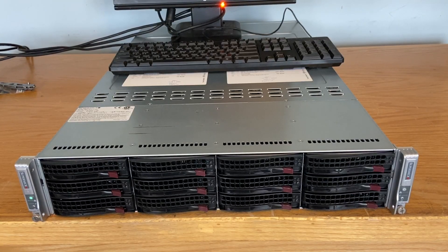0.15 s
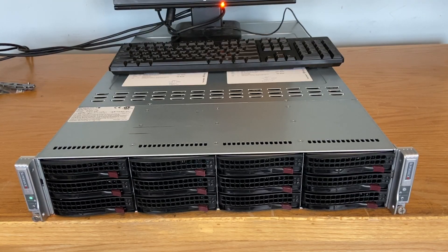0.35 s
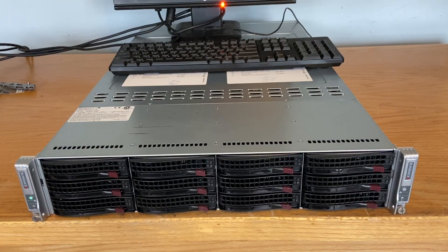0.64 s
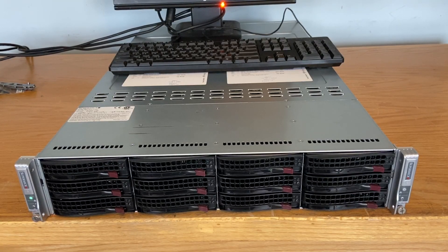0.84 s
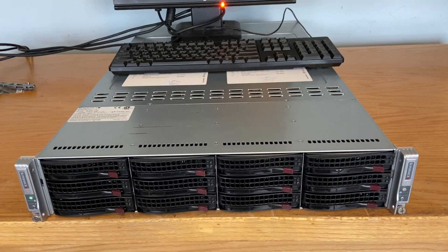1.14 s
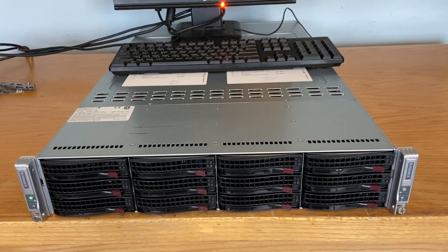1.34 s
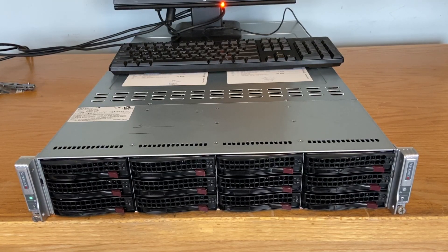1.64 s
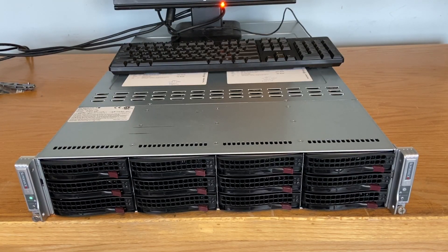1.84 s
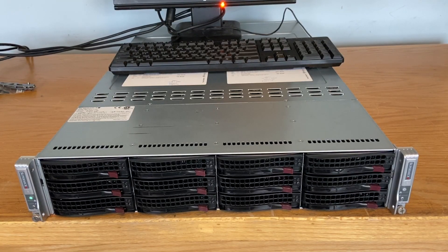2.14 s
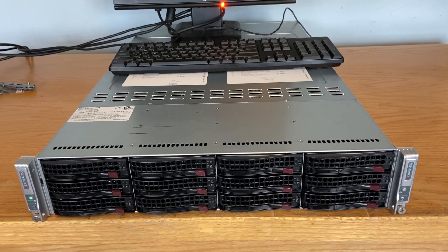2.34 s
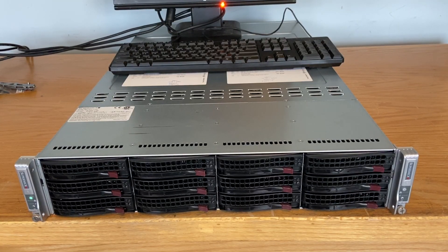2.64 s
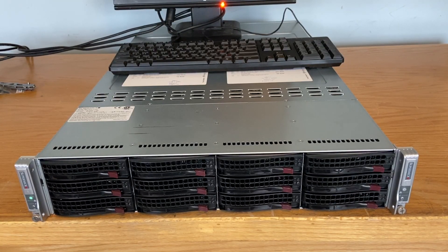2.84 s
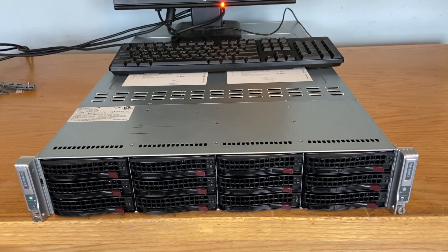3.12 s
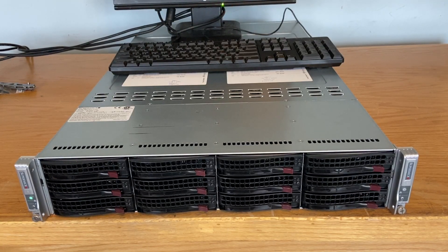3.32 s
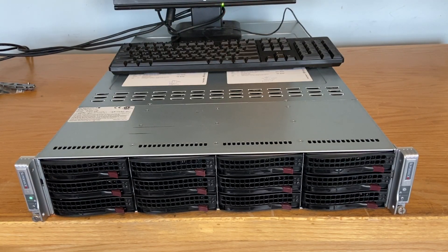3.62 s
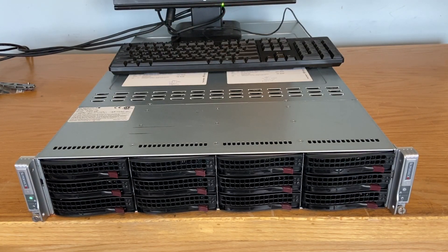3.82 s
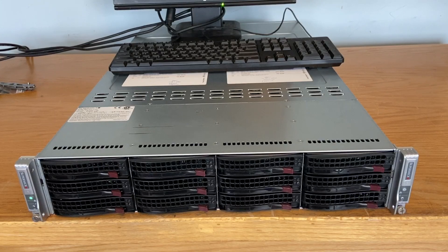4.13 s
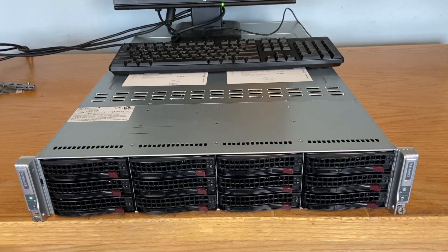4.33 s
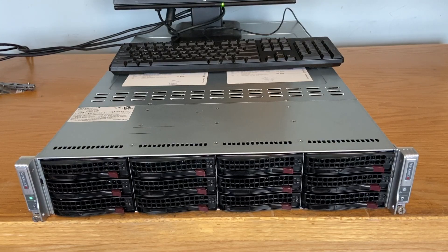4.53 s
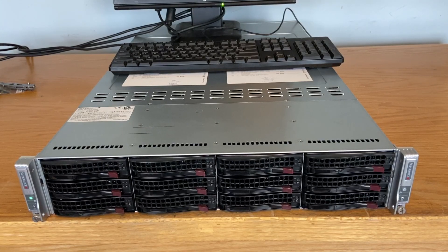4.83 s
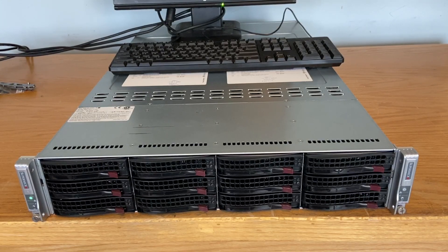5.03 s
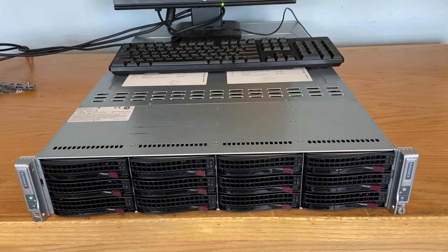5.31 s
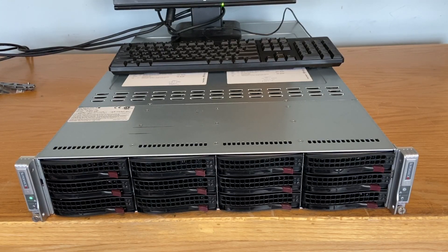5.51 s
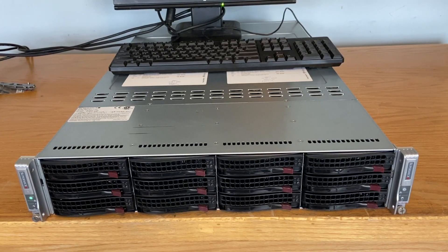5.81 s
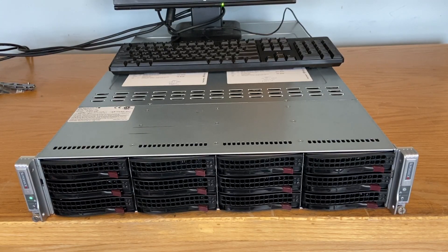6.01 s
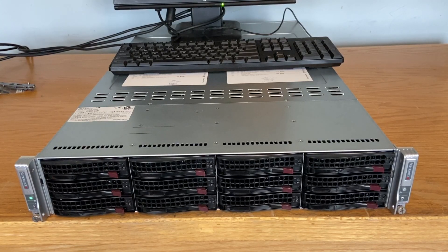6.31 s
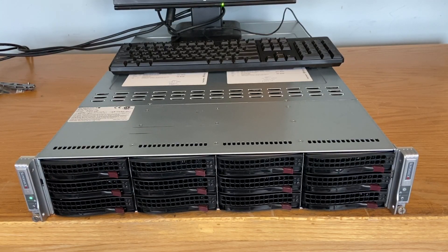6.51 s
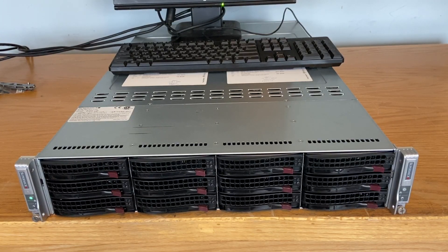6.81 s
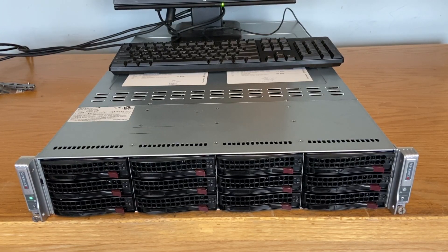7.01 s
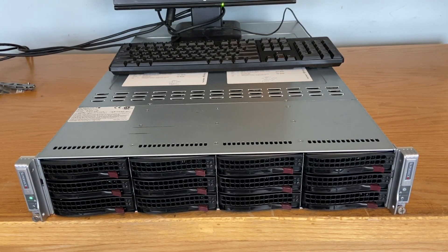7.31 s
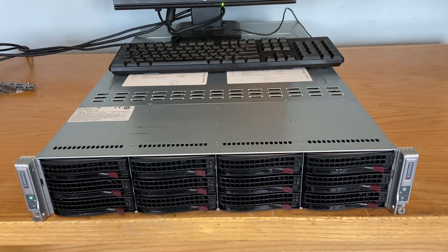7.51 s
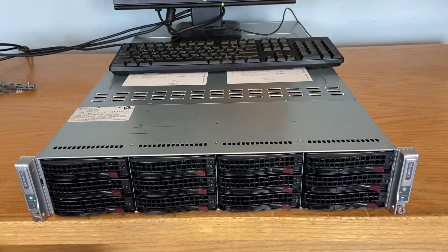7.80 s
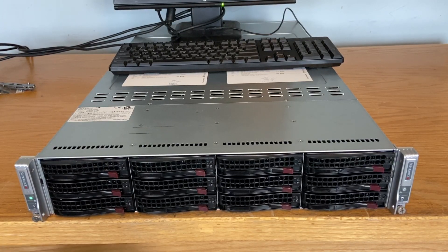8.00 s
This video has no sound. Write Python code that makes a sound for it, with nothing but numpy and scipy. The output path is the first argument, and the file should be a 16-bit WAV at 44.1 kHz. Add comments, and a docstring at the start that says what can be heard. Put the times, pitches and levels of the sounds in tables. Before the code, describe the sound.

Close in front of a metal rack server on a desk in a quiet room, cooling fans already whining climb quickly in pitch and loudness. By about two seconds they reach full speed and hold a steady, slightly beating whine with hollow roaring air and hiss from the drive bays. Two faint low bumps touch the hand-held stereo microphone at the very end.

```python
"""A whine already sounding climbs to a steady pitch: a rack server's cooling fans spin up to full speed.
Two five-bladed rotors at slightly different speeds radiate harmonics of their shafts, whose tones beat.
Filtered noise makes the air that roars in the steel case and hisses through the drive bays in front,
growing as powers of fan speed. Near the end two low, decaying bumps nudge the hand-held microphone."""
import sys
import numpy as np
from scipy.fft import rfft, irfft, next_fast_len
from scipy.io import wavfile
from scipy.ndimage import map_coordinates

SR = 44100
rng = np.random.default_rng(int(sys.argv[2]) if len(sys.argv) > 2 else 0)


def master_out(mix):
    """Clip the mix to full scale and print it as 16-bit PCM to the path in sys.argv[1]."""
    frames = np.transpose(np.atleast_2d(mix))
    ceiling = np.clip(frames, -1, 1)
    pcm = np.round(ceiling * 32767).astype(np.int16)
    wavfile.write(sys.argv[1], SR, pcm)


N = 359415


def amp(db):
    """Amplitude gain is ten to the power of decibels over twenty."""
    return 10 ** (np.asarray(db) / 20)


def unit(x):
    """Scale to rms 1, since mean square measures the power of noise."""
    return x / np.sqrt(np.mean(x ** 2) + 1e-20)


def along(points, hz):
    """Interpolate (f/Hz, value) points linearly on a logarithmic frequency axis."""
    f, value = np.transpose(points)
    return np.interp(np.log(hz + 1), np.log(f + 1), value)


def wobble(knots_per_s):
    """Band-limited random modulation: a smooth curve through random knots."""
    knots = rng.standard_normal(int(N * knots_per_s / SR) + 4)
    return map_coordinates(knots, [np.arange(N) * knots_per_s / SR])


def ears(balance_db, lead):
    """Complex left and right gains: interaural level and phase differences at constant total power."""
    half = amp(balance_db / 2) * np.exp(.5j * lead)
    return np.array([half, 1 / half]) / np.sqrt((abs(half) ** 2 + abs(half) ** -2) / 2)


def case_lift(hz):
    """Cavity resonance: each air mode of the case lifts a bell-shaped band, in dB."""
    # modes of the enclosed air: f/Hz, width/Hz, lift/dB
    modes = [(158, 24, 4), (220, 11, 6.5), (238.5, 13.5, 7), (284.4, 13, 13.5), (299.2, 14.8, 8.5),
             (433, 20, 4), (541, 41, 5.5), (882, 14, 2.5), (928, 8.5, 5.5), (1002, 14, 3.5), (1135, 8.3, 1),
             (1153, 24, 9), (1187, 19, 6.5), (1338, 43, 6), (1398, 14, 9), (1522, 23, 3.5), (1610, 35, 8),
             (4115, 26, 6)]
    return sum(db / (1 + (2 * (hz - centre) / width) ** 2) for centre, width, db in modes)


def turbulence(spectrum):
    """Broadband flow noise of rms 1, coloured by cavity modes and partly coherent between left and right."""
    # coherence of the two channels: f/Hz, correlation before the phase lead
    likeness = [(60, 0.89), (280, 0.85), (450, 0.63), (570, 0.55), (780, 0.46), (950, 0.8), (1100, 0.62),
                (1450, 0.68), (1800, 0.54), (3300, 0.6), (5400, 0.25), (7000, 0.94), (9000, 0.99),
                (11000, 0.98), (15000, 0.65)]
    # phase by which left leads right: f/Hz, phase/rad
    phase_lead = [(250, 0), (430, 0.23), (600, 0.5), (780, 0.2), (930, 0.2), (1250, 1.04), (2200, 1.31),
                  (3500, 1.33), (4100, 0.57), (5500, 1.85), (6500, 0.9), (7400, 0.5), (9000, 3),
                  (11100, 6.3), (13500, 9.3), (15000, 11)]
    # level of left over right: f/Hz, level/dB
    balance = [(300, 0), (500, 0.5), (820, 5), (1400, 1), (2000, 0.5), (2900, 5.5), (3800, 3.5),
               (4550, 8.5), (5400, 2.5), (6000, 3.5), (7200, 0)]
    m = next_fast_len(N + SR // 4)
    hz = np.fft.rfftfreq(m, 1 / SR)
    # mid and side in the ratio cos to sin give a correlation of cos(2 * turn)
    turn = np.arccos(np.clip(along(likeness, hz), -1, 1)) / 2
    colour = amp(along(spectrum, hz) + case_lift(hz))
    noise = rfft(rng.standard_normal((2, m)))
    mid, side = noise * colour * [np.cos(turn), np.sin(turn)]
    pair = np.array([mid + side, mid - side])
    pair = pair * ears(along(balance, hz), along(phase_lead, hz))
    return unit(irfft(pair, m)[:, :N])


def room_murmur():
    """Stationary noise: the room's own low murmur of air does not follow the fans."""
    # spectral shape: f/Hz, relative density/dB per Hz
    spectrum = [(20, -34), (60, -9), (120, -7), (170, -4), (240, 0), (300, -5.5), (600, -18), (3000, -49)]
    return amp(-51.0) * turbulence(spectrum)


def nudge(at, length, centre_hz, level_db):
    """Impulsive excitation: a hand's bump on the microphone body swells and dies over a few low cycles."""
    t = np.maximum(np.arange(N) / SR - at, 0)
    u = t / length
    envelope = u * np.exp(1 - u)  # peaks at 1 when t equals length
    return amp(level_db) * envelope * np.sin(2 * np.pi * centre_hz * t)


def hand_bumps():
    """Superposition of soft bumps conducted through the microphone's body."""
    # start of each bump and peak of its envelope: t/s, level/dB
    bumps = [(7.888, -31.5), (8.045, -40)]
    return sum(nudge(at, length=0.015, centre_hz=52, level_db=db) for at, db in bumps)


def airflow(speed, spectrum, level_db, power, flutter_db):
    """Aerodynamic scaling: noise amplitude grows as a power of fan speed and flutters in level."""
    growth = (speed / speed[-1]) ** power
    return turbulence(spectrum) * growth * amp(level_db + flutter_db * wobble(14))


def rumble(speed):
    """Low-frequency turbulence of the driven air, growing moderately with speed."""
    # spectral shape: f/Hz, relative density/dB per Hz
    spectrum = [(15, -58), (30, -25), (48, -8.5), (70, -3.5), (115, -7), (170, -5), (260, -8.5), (330, 1),
                (450, -16), (900, -55)]
    return airflow(speed, spectrum, level_db=-40.0, power=1.8, flutter_db=0.96)


def churn(speed):
    """Blade churning scales weakly with speed, so it is already there at low speed."""
    # spectral shape: f/Hz, relative density/dB per Hz
    spectrum = [(200, -37), (295, -3.5), (410, -3), (480, -18), (545, -6.5), (620, 2.5), (730, -1),
                (800, -7.5), (990, -4), (1300, -10), (3000, -45)]
    return airflow(speed, spectrum, level_db=-37.0, power=0.53, flutter_db=1)


def roar(speed):
    """Broadband turbulence in the steel case, growing steeply with speed."""
    # spectral shape: f/Hz, relative density/dB per Hz
    spectrum = [(200, -61), (310, -21), (390, -1), (450, -1.5), (485, -8.5), (620, -1.5), (720, -9),
                (820, -9.5), (930, -2), (1060, -10), (1400, -9.5), (1700, -15.5), (2000, -14), (3000, -54)]
    return airflow(speed, spectrum, level_db=-28, power=3.04, flutter_db=0.6)


def howl(speed):
    """Narrow-band noise under a very steep power law: a hollow howl builds only near full speed."""
    # spectral shape: f/Hz, relative density/dB per Hz
    spectrum = [(490, -41), (526, -0.5), (540, 1), (560, -10), (610, -43.5)]
    return airflow(speed, spectrum, level_db=-38.5, power=13, flutter_db=2.0)


def hiss(speed):
    """High-frequency turbulence of the air passing the drive bays."""
    # spectral shape: f/Hz, relative density/dB per Hz
    spectrum = [(700, -30), (1700, 0), (2300, 1), (2850, 2.5), (3350, 1), (3700, -2.5), (4100, 0),
                (4600, 0.5), (5000, -4), (5600, -8), (7000, -11), (9000, -30)]
    return airflow(speed, spectrum, level_db=-36.5, power=2.3, flutter_db=0.5)


def fizz(speed):
    """Small-scale turbulence: the finest eddies at the bays hold the highest frequencies."""
    # spectral shape: f/Hz, relative density/dB per Hz
    spectrum = [(3000, -20), (7000, 0), (9000, -2), (11200, -1.5), (12300, -3.5), (13500, -11),
                (15000, -16)]
    return airflow(speed, spectrum, level_db=-50.0, power=3.1, flutter_db=0.8)


def bay_tearing(speed):
    """Onset of tearing flow: below full speed the bays lose level with the squared shortfall in speed."""
    calm_db = 48  # loss in dB per squared fractional shortfall
    return amp(-calm_db * (1 - speed / speed[-1]) ** 2)


def shaft_speeds(hunt):
    """Rotation rates in turns per second: a common drive hunts, and a speed offset sets the beat rate."""
    # spin-up of the louder, slower fan before hunting: t/s, rate/turns per s
    spin_up = [(0, 62.4), (.2, 66.8), (.5, 74.14), (.8, 81.79), (.95, 85.68), (1.1, 88.62), (1.3, 91.32),
               (1.5, 93.35), (1.7, 94.82), (2, 95.7), (2.6, 96.31), (3.4, 96.58), (5, 96.74), (6.5, 96.78),
               (8.15, 96.75)]
    # how far the other fan runs ahead: t/s, rate difference/turns per s
    ahead = [(0, 1.19), (0.6, 1.35), (0.85, 1.08), (1.1, 1.375), (1.4, 1.5), (1.7, 1.025), (2, 0.675),
             (2.5, 0.86), (3.2, 0.94), (4, 0.92), (5, 0.77), (6, 0.88), (7, 0.91), (8.15, 1.09)]
    t = np.arange(N) / SR
    slower = np.interp(t, *np.transpose(spin_up)) * (1 + hunt * wobble(2.98))
    return slower, slower + np.interp(t, *np.transpose(ahead))


def dip_gain():
    """Amplitude modulation: brief Gaussian dips, in dB, of the upper whine."""
    # centre and depth of each dip: t/s, depth/dB
    dips = [(1.275, 3), (1.68, 9), (2.86, 12), (3.65, 6), (3.95, 9), (4.16, 9), (6.665, 4), (6.872, 8)]
    dip_s = 0.014  # half-width at 1/e of the depth
    t = np.arange(N) / SR
    return amp(-sum(db * np.exp(-((t - at) / dip_s) ** 2) for at, db in dips))


def fan(speed, lines, bays, level_db, rough, straining):
    """Shaft harmonics swell in passing the case's resonances; uneven inflow modulates level and phase."""
    rough_per_order = .016  # inflow shakes the upper orders more
    waver_db, dip_from_order = 1.3, 10  # slow waver of the shaft hum; the lowest order that dips
    angle = 2 * np.pi * np.cumsum(speed) / SR
    share = speed / speed[-1]
    out, dips = np.zeros((2, N)), dip_gain()
    for order, db, power, balance_db, lead in lines:
        order = round(order)
        swell_db = along(bays, order * speed)
        swell = amp(swell_db - swell_db[-1])
        # the inflow is more uneven below full speed
        shake = rough + straining * (1 - share) + rough_per_order * order
        inflow = 1 + shake * (wobble(45) + 1j * wobble(45))
        inflow /= np.sqrt(1 + 2 * shake ** 2)
        # the higher tones waver less
        inflow *= amp(waver_db / np.sqrt(order) * wobble(5))
        tone = swell * share ** power * inflow * np.exp(1j * order * angle)
        if order >= dip_from_order:
            tone = tone * dips
        # a tone that the whole case carries moves to the middle
        off_centre = 1 / np.maximum(swell, 1) ** 2
        pair = ears(balance_db * off_centre, lead * off_centre) * tone
        out += np.sqrt(2) * amp(db + level_db) * np.real(pair)
    return out


def faster_fan(speed):
    """Blade-passing harmonics of the faster rotor, shaped by its own place in the case."""
    # harmonics: shaft order, relative level at full speed/dB, power of speed,
    # left over right/dB, left's lead/rad
    lines = [(1, -82, 3, 1, -3), (5, -40.5, 0.43, 3.5, -2.5), (10, -38.5, 2, 5, 0.43),
             (15, -42, 3.2, 3, 1.5), (20, -53, 4.3, -6, -2.8)]
    # transmission out through case and bays: f/Hz, relative gain/dB
    bays = [(315, 1), (340, 6), (366, 1), (378, 12), (395, 9), (412, 13.5), (462, 10.5), (478, 1.5),
            (490, 0.5), (630, -15), (760, -16), (870, -14), (890, 2), (975, -0.5), (1020, 3), (1120, 0),
            (1150, 4), (1178, 11), (1220, 1), (1300, 6), (1360, 3), (1405, 8), (1438, -3), (1465, 0.5)]
    return fan(speed, lines, bays, level_db=-0.5, rough=0.14, straining=0.9)


def louder_fan(speed):
    """Shaft and blade-passing harmonics of the louder rotor; five blades favour multiples of five."""
    # harmonics: shaft order, level at full speed/dB, power of speed,
    # left over right/dB, left's lead/rad
    lines = [(1, -45.5, 3, 0, 0.16), (3, -55.5, 6.1, 1, 0), (4, -44.5, 1.3, 4, -0.1),
             (5, -38.5, 5, -6, 0.3), (6, -58, 14, 6, 5), (8, -47, 14, 6, 2.5), (10, -27.5, 2.4, 1, 0.33),
             (15, -51, 1.8, -1.5, -1), (20, -43.5, 11, 2.7, 0), (30, -55, 9.2, 1, -1)]
    # transmission out through case and bays: f/Hz, relative gain/dB
    bays = [(74, -13), (82, -2), (89, -15), (92, -5), (95, -3), (96, 1), (255, 18), (270, 10), (285, 25.5),
            (312, 3), (340, 10.5), (362, 11), (376, 10.5), (435, 8.5), (458, 9), (474, 0), (500, -0.5),
            (625, -3), (690, -5), (750, -10), (862, -11), (878, 2), (912, -2), (935, 2.5), (950, -2.5),
            (966, 2.5), (1160, 7), (1380, 5), (1450, 1)]
    return fan(speed, lines, bays, level_db=0, rough=0.089, straining=1.7)


def scene():
    """Linear superposition of the room, the bumps, the driven air and both fans."""
    speed_a, speed_b = shaft_speeds(hunt=0.0003)
    speed = (speed_a + speed_b) / 2
    air = rumble(speed) + churn(speed) + roar(speed) + howl(speed)
    bay_air = bay_tearing(speed) * (hiss(speed) + fizz(speed))
    # each shared order beats at its number times the difference in speed
    whine = faster_fan(speed_b) + louder_fan(speed_a)
    return room_murmur() + hand_bumps() + air + bay_air + whine


def record(dry):
    """Band limitation: a short ramp prevents an opening click and a low-pass removes the extreme top."""
    top_hz, fade_s = 15200, .002
    fade_in = np.minimum(np.arange(N) / (fade_s * SR), 1)
    m = next_fast_len(N + SR // 2)
    passed = np.fft.rfftfreq(m, 1 / SR) < top_hz
    return irfft(rfft(dry * fade_in, m) * passed, m)[..., :N]


dry = scene()
out = record(dry)
master_out(out)
```